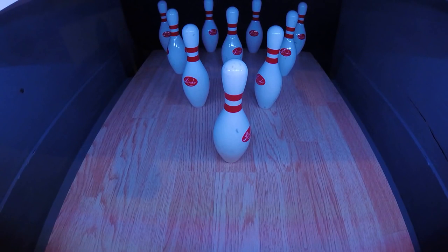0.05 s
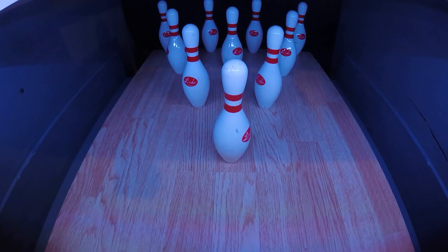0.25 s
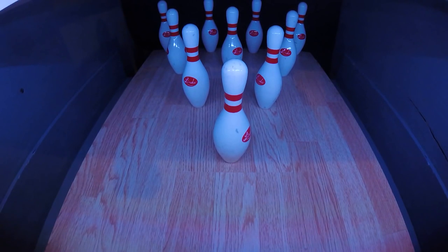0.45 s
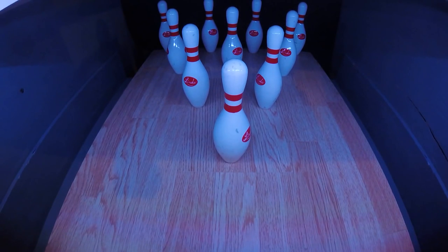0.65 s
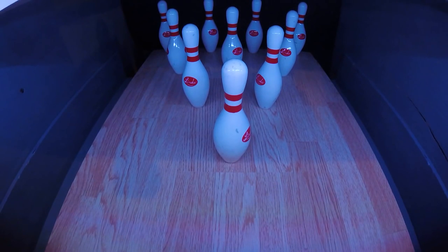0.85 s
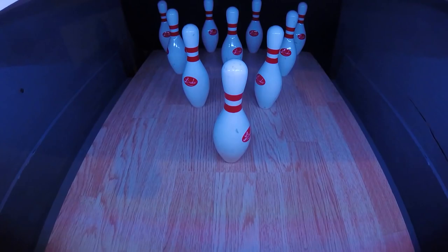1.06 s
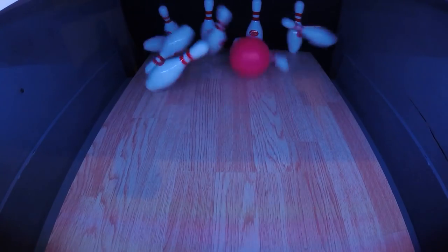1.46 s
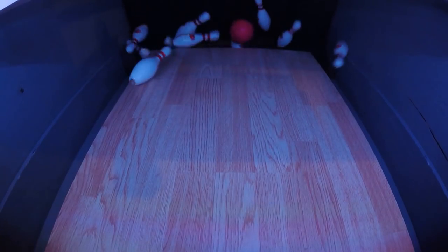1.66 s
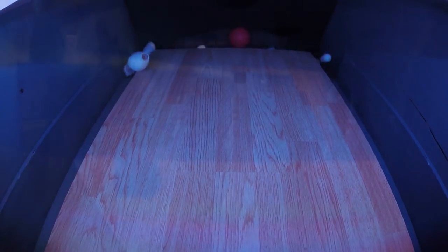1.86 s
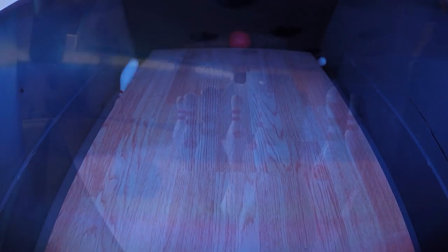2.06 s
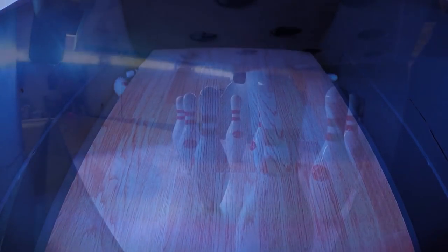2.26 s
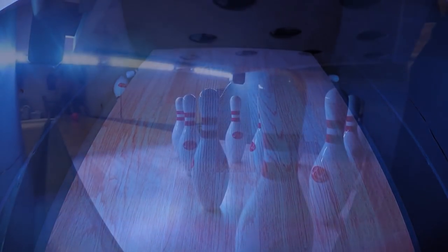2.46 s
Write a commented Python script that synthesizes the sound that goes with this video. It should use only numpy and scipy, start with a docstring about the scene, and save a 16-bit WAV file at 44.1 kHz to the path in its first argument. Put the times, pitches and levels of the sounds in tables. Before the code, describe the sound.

A bowling ball booms onto a wooden lane at about 0.25 seconds, hops lightly near 0.6 and 1.0, and rumbles closer with a thin, high hiss. At 1.4 seconds it crashes into the pins, which clack sharply together. Hollow knocks follow as they hit the side boards and pit, dying down by 2.5 seconds. A small, hard room rings, and the loudest hits slightly overload the microphone.

```python
"""A bowling ball booms onto a short wooden lane, hops twice and rumbles closer.
A thin, high hiss swells and fades alongside.
The ball crashes into the pins, which clack against each other, then knock about on deck and in the pit.
Blows are decaying resonances of boards, pins and panels plus noise bursts; the roll is shaped noise.
A small hard room rings after the blows, and the loudest peaks overload the microphone."""
import sys
import numpy as np
from scipy import signal
from scipy.io import wavfile
from scipy.ndimage import uniform_filter1d

SR = 44100
rng = np.random.default_rng(int(sys.argv[2]) if len(sys.argv) > 2 else 0)


def waveform_to_disk(signal):
    """Save audio, clipped to [-1, 1], as 16-bit WAV at the path in sys.argv[1]."""
    frames = np.transpose(np.atleast_2d(signal))
    scaled = np.clip(frames, -1, 1) * 32767
    samples = np.round(scaled).astype(np.int16)
    wavfile.write(sys.argv[1], SR, samples)


N = 114660
TIME_S = np.arange(N) / SR
RING_S = np.arange(int(.8 * SR)) / SR  # time axis of one blow
EDGES_HZ = 22 * 2 ** np.arange(0, 9.6, 1 / 3)
CENTRES_HZ = np.sqrt(EDGES_HZ[1:] * EDGES_HZ[:-1])

# Ball impacts on the lane. Each row: start in seconds, then boom, board ring, slap and slap treble in dB.
LANDINGS = [(0.2427, -19.5, -11.5, -19.5, -1.5), (.2545, -11, -14, -17, -5.5),
            (.623, -26.5, -25.5, -28.5, -8), (1.039, -28.5, -45.5, -26, -14), (1.062, -27, -44, -41, -8)]


def from_db(db):
    """Decibels to gain."""
    return 10 ** (np.asarray(db) / 20)


def curve(rows, column=1):
    """One dB column of a level table as gain over time."""
    rows = np.array(rows)
    return from_db(np.interp(TIME_S, rows[:, 0], rows[:, column]))


def per_band(rows):
    """The columns of a spectrum table at the band centres."""
    hz, *columns = np.transpose(rows)
    return [np.interp(np.log(CENTRES_HZ), np.log(hz), column) for column in columns]


def noise_bands():
    """White noise in third octaves, neighbours uncorrelated."""
    white = rng.standard_normal((2, N + SR))
    filters = [signal.butter(2, EDGES_HZ[k:k + 2], "band", fs=SR, output="sos")
               for k in range(len(CENTRES_HZ))]
    return np.array([signal.sosfilt(sos, white[k % 2])[SR:] for k, sos in enumerate(filters)])


def unit_rms(x):
    """Scale to unit power."""
    return x / np.sqrt(np.mean(x ** 2) + 1e-20)


def coloured(bands, spectrum):
    """Steady unit-power noise with the given spectrum."""
    return unit_rms(from_db(per_band(spectrum)[0]) @ bands)


def narrow_noise(hz, width_hz):
    """Noise passed twice through one resonance, at unit power."""
    b, a = signal.iirpeak(hz, hz / width_hz, fs=SR)
    return unit_rms(signal.lfilter(b, a, signal.lfilter(b, a, rng.standard_normal(N))))


def soft_start(cycles, rise_cycles):
    """Onset over part of a cycle: a contact is never instant."""
    return 1 - np.exp(-np.minimum((cycles / rise_cycles) ** 2, 20))


def ring(hz, t60_s, hold_s=0):
    """One struck resonance; its decay begins after hold_s."""
    decay = from_db(-60 * np.maximum(RING_S - hold_s, 0) / t60_s)
    return np.sin(2 * np.pi * hz * RING_S) * decay * soft_start(hz * RING_S, rise_cycles=0.35)


def body(modes, scatter_db=3.5):
    """All modes of an object, with new strengths and signs for each blow."""
    return sum(rng.choice([-1, 1]) * from_db(db + scatter_db * rng.normal()) * ring(hz, t60_s)
               for hz, db, t60_s in modes)


def burst(bands, spectrum, treble_db=0, shelf_hz=2770):
    """Countless close modes: noise, normalised ahead of a treble shelf, that dies band by band."""
    db, t60_s = per_band(spectrum)
    power = np.sum(from_db(db) ** 2 * np.diff(EDGES_HZ)) * 2 / SR
    shelf = from_db(treble_db / (1 + (shelf_hz / CENTRES_HZ) ** 2))
    gain = from_db(db) / np.sqrt(power) * shelf
    t = RING_S[RING_S < t60_s.max()]
    decay = np.exp(-np.minimum(np.log(1000) * t / t60_s[:, None], 20))
    onset = soft_start(CENTRES_HZ[:, None] * t, rise_cycles=0.45)
    offset = rng.integers(N - len(RING_S))
    sound = gain @ (bands[:, offset:offset + len(t)] * decay * onset)
    return np.pad(sound, (0, len(RING_S) - len(t)))


def play(sounds):
    """Mix (start in seconds, sound) pairs onto the time line."""
    out = np.zeros(N + SR)
    for start_s, sound in sounds:
        first = int(start_s * SR)
        out[first:first + len(sound)] += sound
    return out[:N]


def pin_clacks(bands, t60_s=0.0073, hold_s=0.0032, overtone_ratio=1.708, overtone_db=-14.5):
    """Hard hits on pins: a very short pitched clack, the pin's after-ring and a crack."""
    # Each row: start in seconds, clack in dB, pitch in Hz, then after-ring, crack and crack treble in dB.
    hits = [(1.4116, -24.5, 960, -47.5, -36.5, -10), (1.4343, -2.5, 1159, -27, -14.5, 9.5),
            (1.4381, -15, 1110, -32, -16.5, -17), (1.45, -10, 1250, -33, -13, 6.5),
            (1.4558, -12.5, 1296, -38, -24, 8.5), (1.4732, -7.5, 1043, -30.5, -17, -7),
            (1.495, -13.5, 1260, -42, -25, 8.5), (1.516, -25, 1420, -39.5, -31, 13),
            (1.5316, -10, 1050, -32, -17, -5), (1.5546, -17.5, 943, -39.5, -16.5, 14.5),
            (1.5567, -7.5, 876, -45, -15.5, 3.5), (1.568, -15.5, 845, -34.5, -26.5, 10),
            (1.577, -28.5, 925, -30.5, -17, 4.5), (1.6232, -23.5, 925, -48, -21.5, 8),
            (1.686, -12, 1007, -43, -12, -6), (1.691, -17, 1040, -50.5, -20, -11),
            (1.779, -30.5, 1120, -42, -19, -4.5), (1.8355, -13.5, 747, -46, -37.5, -25)]
    # Pin modes and crack spectrum. Each row: frequency in Hz, relative level in dB, T60 in seconds.
    pin_modes = [(783, 0, .17), (1005, -5, .08), (1056, -6, .2), (1078, -4, .1), (1139, -1, .1),
                 (1211, 1, .13), (1261, -4, .3), (1308, -4, .08), (1395, -4, .22), (1516, -9, .13),
                 (1615, -13, .1), (1800, -14, .15), (1822, -14, .2), (2019, -10, .08), (2116, -10, .28),
                 (2165, -10, .14), (2562, -15, .11), (2864, -19, .25), (4780, -21, .08)]
    crack_spectrum = [(80, -1.5, 0.26), (285, 4, 0.045), (910, 9, 0.038), (1440, -1.5, 0.054),
                      (2280, -9.5, 0.04), (3240, -9, 0.058), (4440, -24.5, 0.029), (5740, -22.5, 0.024),
                      (9900, -34.5, .035), (15100, -53, 0.023)]
    sounds = []
    for start_s, db, hz, ring_db, crack_db, treble_db in hits:
        overtone = from_db(overtone_db) * ring(overtone_ratio * hz, t60_s, hold_s)
        clack = from_db(db) * (ring(hz, t60_s, hold_s) + overtone)
        after_ring = from_db(ring_db) * body(pin_modes)
        crack = from_db(crack_db) * burst(bands, crack_spectrum, treble_db)
        sounds.append((start_s, clack + after_ring + crack))
    return play(sounds)


def pit_knocks(bands, swing_db=-6, detune=0.021):
    """Pins and ball hit deck, side boards and pit: a hard first swing, a knock, panel ring, clatter."""
    # Each row: start in seconds, knock in dB, pitch in Hz, then panel, clatter and clatter treble in dB.
    hits = [(1.4355, -16.5, 263, -7, -19, -7), (1.466, -17.5, 299, -19, -47, -9),
            (1.566, -7, 249, -8.5, -16.5, 1), (1.625, -10, 300, -15.5, -32, 1),
            (1.644, -11.5, 360, -13, -22, 16.5), (1.657, -2, 245, -16.5, -24, -8),
            (1.679, -11, 328, -9, -29, -2), (1.6885, -8.5, 300, -11, -12, -3.5),
            (1.735, -22, 760, -22.5, -37, -19.5), (1.7603, -1, 286, -9.5, -41.5, 5.5),
            (1.7848, 5, 263, -4, -19.5, 6), (1.802, -20.5, 421, -15, -36.5, -6),
            (1.8405, -7.5, 305, -14.5, -15.5, -10), (1.9235, -5, 248, -10.5, -26.5, -27.5),
            (1.934, -15, 377, -15, -24.5, -6), (1.950, -15.5, 420, -14, -25.5, 2),
            (1.984, -17, 650, -21, -26, -12), (1.992, -12.5, 383, -14.5, -37.5, -17.5),
            (2.004, -19.5, 448, -20, -24, -4.5), (2.016, -20, 507, -26, -24.5, -2.5),
            (2.084, -33, 590, -31.5, -40, -6.5), (2.1319, -4.5, 428, -9, -21.5, 9.5),
            (2.1329, -11, 813, -20.5, -24, -2), (2.1993, -1.5, 405, -8.5, -17.5, 17.5),
            (2.2012, -10, 825, -21, -27.5, 3), (2.3073, -15.5, 370, -12, -30, 3),
            (2.318, -16, 430, -22.5, -37.5, -2), (2.3553, -14.5, 400, -12, -27.5, -9),
            (2.364, -22, 756, -17, -32, -11), (2.4341, -24.5, 430, -28, -38, -17),
            (2.511, -23.5, 380, -28.5, -35, -23)]
    # Panel modes and clatter spectrum. Each row: frequency in Hz, relative level in dB, T60 in seconds.
    panel_modes = [(127.2, -20.5, 0.13), (242, -38, 0.074), (371, -13, 0.16), (406.4, -22, 0.25),
                   (456.8, -19, 0.16), (585, -25.5, 0.037), (775.3, -25, 0.26), (833, -16.5, 0.059),
                   (1215, -23, 0.057), (1322, -27, 0.11)]
    clatter_spectrum = [(100, -19.5, 0.12), (400, 4.5, 0.083), (770, 6.5, 0.059), (1220, -5.5, 0.0063),
                        (1850, -13, 0.036), (3270, -19.5, 0.027), (5940, -37, 0.023), (14000, -66, .02)]
    sounds = []
    for start_s, db, hz, panel_db, clatter_db, treble_db in hits:
        swing = from_db(swing_db) * ring(hz, t60_s=0.007)
        knock = from_db(db) * (swing + ring(hz, t60_s=0.024))
        # Each knock meets another panel, tuned slightly differently.
        modes = [(mode_hz * np.exp(detune * rng.normal()), *rest) for mode_hz, *rest in panel_modes]
        panel = from_db(panel_db) * body(modes)
        clatter = from_db(clatter_db) * burst(bands, clatter_spectrum, treble_db)
        sounds.append((start_s, knock + panel + clatter))
    return play(sounds)


def ball_landings(bands):
    """The ball slaps the lane and the boards ring."""
    # Board modes and slap spectrum. Each row: frequency in Hz, relative level in dB, T60 in seconds.
    board_modes = [(52.3, -5, 0.55), (61.8, -2.5, 0.31), (101, -2, 0.2), (117, -12.5, 0.32),
                   (146, -3.5, 0.2), (163.8, -11.5, 0.44), (193.6, -11.5, 0.31), (240, -18, 0.47),
                   (268, -9, 0.16), (385, -19.5, 0.27)]
    slap_spectrum = [(61.5, 8.5, 0.3), (206, 8.5, 0.11), (500, -7, 0.36), (1084, -2, 0.3), (1760, -41.5, 1),
                     (3380, -16, 0.067), (7060, -24.5, 0.25), (14000, -59, .08)]
    sounds = []
    for start_s, _, boards_db, slap_db, treble_db in LANDINGS:
        boards = from_db(boards_db) * body(board_modes)
        slap = from_db(slap_db) * burst(bands, slap_spectrum, treble_db)
        sounds.append((start_s, boards + slap))
    return play(sounds)


def lane_boom():
    """Each landing sways the whole lane on one deep note, carried by the floor rather than the air."""
    return play((start_s, from_db(db) * ring(hz=74.8, t60_s=0.54)) for start_s, db, *_ in LANDINGS)


def floor_thuds():
    """The floor gives a low note under heavy blows."""
    # Each row: start in seconds, level in dB, pitch in Hz.
    thuds = [(0.2436, -10.5, 125), (0.6221, -28.5, 164), (0.2546, -13.5, 236.4), (0.2547, -22, 385.6),
             (1.040, -22.5, 266), (1.044, -28.5, 410), (1.438, -14, 116.5), (1.463, -12, 76),
             (1.553, -14.5, 80.2), (1.647, -13.5, 127), (1.685, -13.5, 114.7), (1.786, -11, 246),
             (1.925, -11.5, 143), (2.2, -25, 147.3), (2.308, -22.5, 89.5)]
    return play((start_s, from_db(db) * ring(hz, t60_s=0.11)) for start_s, db, hz in thuds)


def glancing_ticks():
    """Hard glancing contacts each ring one high resonance briefly."""
    # Each row: start in seconds, level in dB, pitch in Hz.
    ticks = [(0.2437, -18, 3590), (0.2482, -23.5, 6460), (0.249, -25, 2580), (.251, -15.5, 1060),
             (.260, -27, 3280), (.2665, -24, 3470), (.6225, -37, 4050), (1.4359, -8.5, 2120),
             (1.4523, -29, 3960), (1.4535, -10.5, 2210), (1.4556, -21, 3230), (1.4707, -25.5, 5100),
             (1.496, -18.5, 3540), (1.522, -29, 5540), (1.559, -18.5, 5650), (1.6855, -16.5, 3400),
             (1.6866, -16, 2800), (1.7608, -30, 3470), (1.7798, -34.5, 3300), (2.1327, -25.5, 1450),
             (2.1997, -15, 1400), (2.2005, -19.5, 1940)]
    return play((start_s, from_db(db) * ring(hz, t60_s=0.012)) for start_s, db, hz in ticks)


def pin_jostle(rate_hz=100, fade_db_per_s=25.5, sink_octaves_per_s=1.8):
    """Runs of small random contacts, weaker and duller as the pins tumble and settle."""
    # Each row: start and end in seconds, initial level in dB, initial pitch in Hz.
    runs = [(1.441, 2.04, -25, 1434), (2.213, 2.498, -30, 606)]
    scatter_db, spread_octaves, tilt_db_per_octave = 2, .7, -3.5
    sounds = []
    for start_s, end_s, start_db, start_hz in runs:
        count = int(rate_hz * round(end_s - start_s, 1))
        ages_s = rng.random(count) * (end_s - start_s)
        draws = np.clip(rng.standard_normal((count, 2)), -2, 2)
        for age_s, (offset_db, octaves) in zip(ages_s, draws * [scatter_db, spread_octaves]):
            hz = start_hz * 2 ** (octaves - sink_octaves_per_s * age_s)
            db = start_db + offset_db - fade_db_per_s * age_s + tilt_db_per_octave * octaves
            sounds.append((start_s + age_s, from_db(db) * ring(hz, t60_s=0.029)))
    return play(sounds)


def roll_and_hiss(sing_hz=(5460, 7080), sing_width_hz=670):
    """The ball rumbles on the boards and a roar lingers under the pins.
    A high hiss and two whistling bands swell alongside and fade out at the crash."""
    # Each row: time in seconds, rumble in dB.
    rumble_levels = [(.24, -77), (.3, -45), (.55, -50.5), (1.03, -40.5), (1.1, -36), (1.19, -30.5),
                     (1.4, -39), (1.52, -28), (1.7, -26.5), (2.0, -39.5), (2.1, -47.5), (2.32, -38),
                     (2.6, -45.5)]
    # Each row: time in seconds, then mid-range roar, hiss and top-treble sheen in dB.
    noise_levels = [(.24, -96, -67, -79), (.27, -34.5, -45.5, -69), (.5, -47.5, -54, -64.5),
                    (.75, -44.5, -51.5, -73), (1.0, -42.5, -50.5, -71.5), (1.18, -36.5, -50.5, -68),
                    (1.28, -40.5, -46, -61.5), (1.39, -28, -47.5, -69), (1.5, -33.5, -48, -64),
                    (1.64, -39, -56, -71), (1.9, -34, -86.5, -102), (2.1, -50.5, -87.5, -89),
                    (2.25, -37.5, -69, -89), (2.45, -53.5, -64.5, -86), (2.6, -45.5, -58.5, -87)]
    # Each row: time in seconds, then lower and upper whistling band in dB.
    sing_levels = [(.24, -82, -81), (.3, -59, -62), (.55, -62, -64.5), (.95, -61.5, -67), (1.06, -59, -66),
                   (1.12, -51.5, -62), (1.19, -56, -59), (1.255, -56, -52), (1.32, -57, -58),
                   (1.41, -59, -66), (1.7, -87, -96.5), (2.6, -74.5, -92.5)]
    # Spectra of rumble, roar, high hiss and sheen. Each row: frequency in Hz, relative level in dB.
    rumble_spectrum = [(25, 3), (48, 2), (74, 15), (95, 7), (120, -7.5), (170, -8.5), (260, -12), (400, -7),
                       (900, -75)]
    roar_spectrum = [(150, 12.5), (280, -13.5), (420, -4.5), (550, 2.5), (900, 8.5), (1250, -3.5),
                     (1700, -68), (3000, -10.5), (6000, -73.5)]
    hiss_spectrum = [(1000, 8.5), (2200, -0.5), (3500, 7.5), (4600, 4), (5600, 0), (7200, -1.5),
                     (8500, -21.5), (11000, -47), (15000, -42.5)]
    sheen_spectrum = [(5000, -18), (7000, 1.5), (8500, -3), (10500, -4.5), (13000, -21.5), (16000, -35)]
    bands_a, bands_b = noise_bands(), noise_bands()
    rumble = curve(rumble_levels) * coloured(bands_a, rumble_spectrum)
    roar = curve(noise_levels) * coloured(bands_b, roar_spectrum)
    hiss = curve(noise_levels, column=2) * coloured(bands_a, hiss_spectrum)
    sheen = curve(noise_levels, column=3) * coloured(bands_b, sheen_spectrum)
    sing = sum(curve(sing_levels, column) * narrow_noise(hz, sing_width_hz)
               for column, hz in enumerate(sing_hz, start=1))
    return rumble + roar + hiss + sheen + sing


def loose_rattles(bands):
    """Something loose rattles faintly as the ball rolls."""
    # Each row: start in seconds, level in dB.
    rattles = [(.595, -37), (0.8094, -30.5), (.828, -47.5), (1.018, -40)]
    # Rattle spectrum. Each row: frequency in Hz, relative level in dB, T60 in seconds.
    spectrum = [(202, 0.5, 0.27), (810, 2, 0.17), (1135, -5, 0.64), (1740, -50, 0.14), (7910, -51, 0.072)]
    return play((start_s, from_db(db) * burst(bands, spectrum)) for start_s, db in rattles)


def room(x, level_db=-13.5, build_s=0.0036):
    """A diffuse tail that builds quickly and dies soonest in the top treble."""
    # Tail spectrum. Each row: frequency in Hz, relative level in dB, T60 in seconds.
    spectrum = [(80, 4, 0.53), (394, -4, 0.56), (1010, -2.5, 0.61), (1940, -8.5, 0.59), (4660, -0.5, 0.72),
                (12000, -4.5, 0.38)]
    tail = burst(noise_bands(), spectrum) * (1 - np.exp(-RING_S / build_s))
    return from_db(level_db) * signal.fftconvolve(x, tail / np.sqrt(np.sum(tail ** 2)))[:N]


def still_air(bands, level_db=-47.5):
    """Faint steady background noise, mostly bass."""
    # Each row: frequency in Hz, relative level in dB.
    spectrum = [(15, -37), (25, -0.5), (121, 5), (198, -7.5), (244, 2), (332, -17.5), (801, -14.5),
                (4900, -45.5), (9360, -68.5), (12100, -60), (15800, -70), (22000, -120)]
    return from_db(level_db) * coloured(bands, spectrum)


def dip(start_s=1.4195, end_s=1.4335, depth_db=-17.5):
    """Gain that drops briefly just before the crash."""
    inside = ((TIME_S > start_s) & (TIME_S < end_s)).astype(float)
    return from_db(depth_db * uniform_filter1d(inside, size=64))


def scene():
    """Ball, pins and pit in the room, over still air; mono."""
    bands = noise_bands()
    hits = ball_landings(bands) + loose_rattles(bands)
    hits += pin_clacks(bands) + pit_knocks(bands) + pin_jostle() + floor_thuds()
    ticks = glancing_ticks()
    reverb = room(hits + from_db(-1) * ticks)  # ticks excite the room less
    mix = hits + ticks + reverb + lane_boom() + roll_and_hiss()
    return (dip() * mix + still_air(bands))[None]


def record(dry):
    """The overloaded microphone rounds the peaks; the deepest bass and the top are cut."""
    ceiling, low_cut_hz, high_cut_hz = 0.97, 11, 14600
    rounded = ceiling * np.tanh(dry / ceiling)
    highpass = signal.butter(2, low_cut_hz, "high", fs=SR, output="sos")
    lowpass = signal.cheby2(8, 60, high_cut_hz, fs=SR, output="sos")
    return signal.sosfilt(lowpass, signal.sosfilt(highpass, rounded))


dry = scene()
out = record(dry)
waveform_to_disk(out)
```